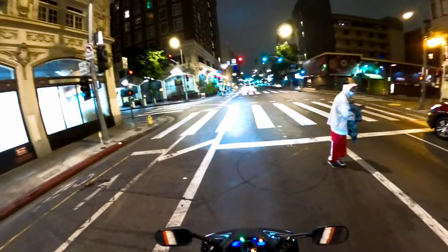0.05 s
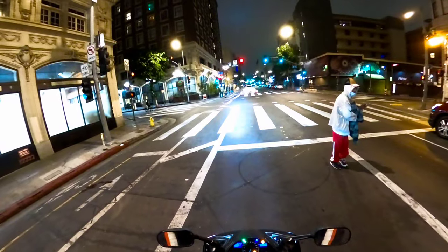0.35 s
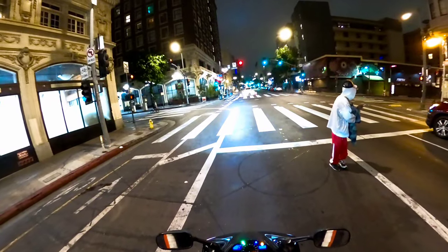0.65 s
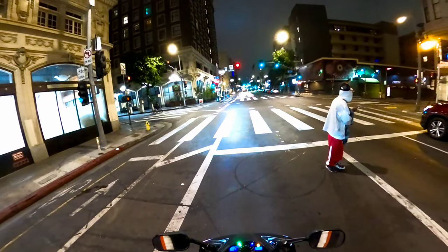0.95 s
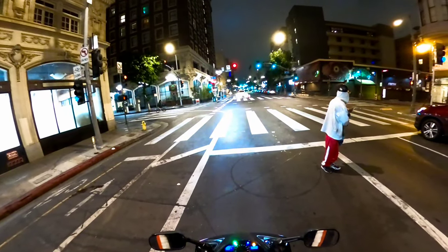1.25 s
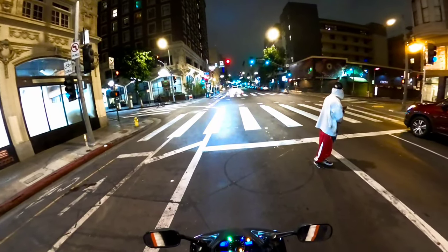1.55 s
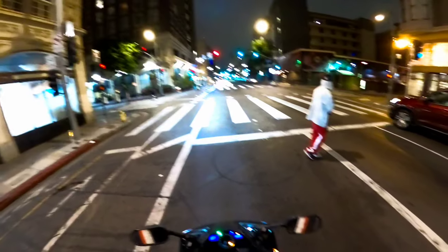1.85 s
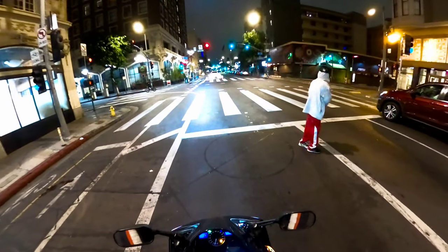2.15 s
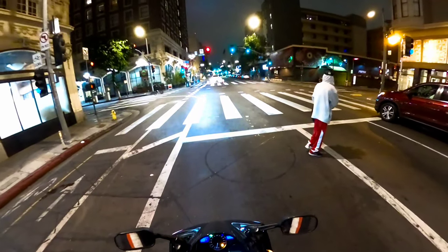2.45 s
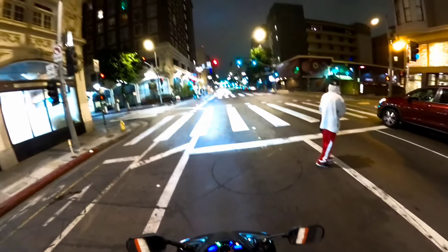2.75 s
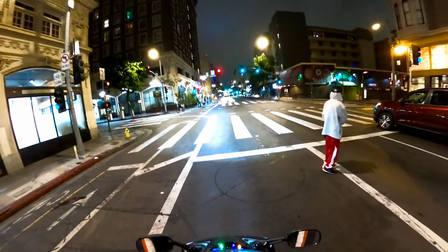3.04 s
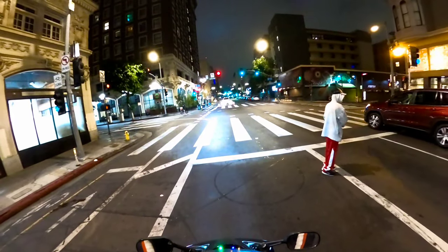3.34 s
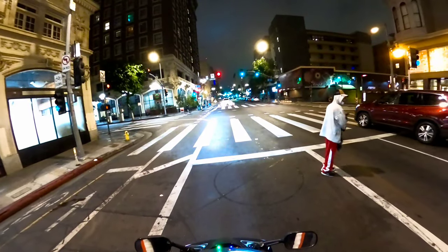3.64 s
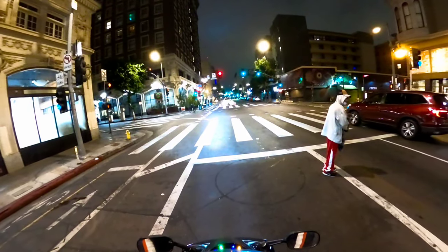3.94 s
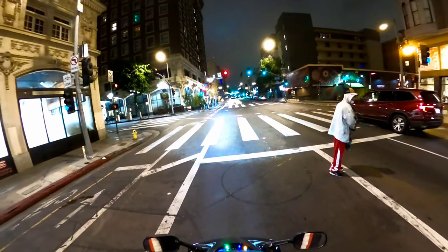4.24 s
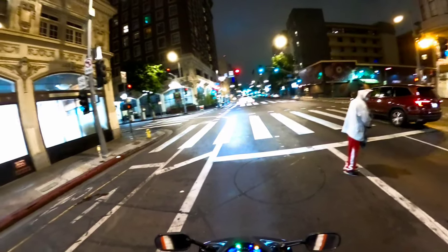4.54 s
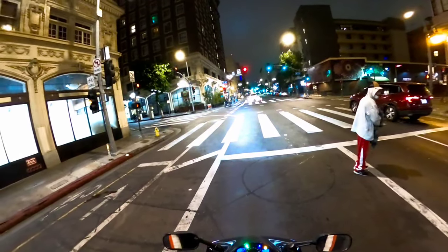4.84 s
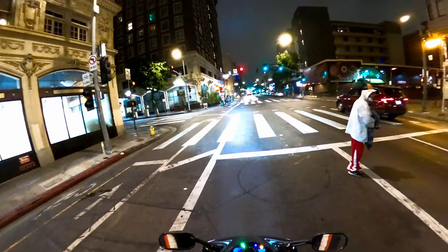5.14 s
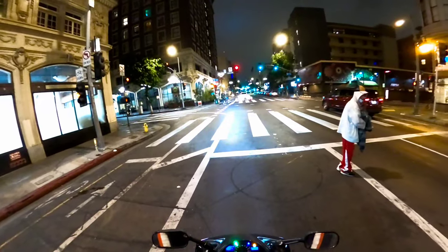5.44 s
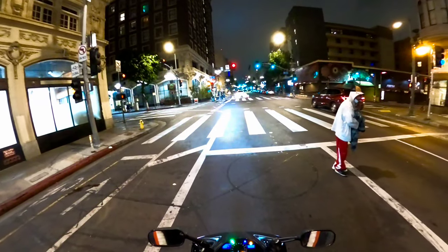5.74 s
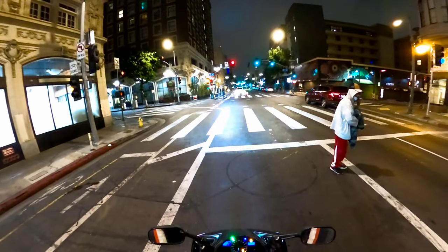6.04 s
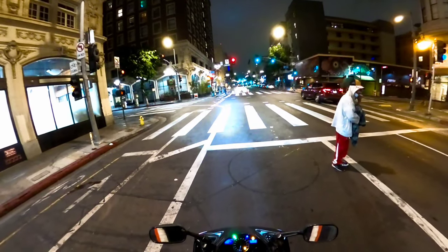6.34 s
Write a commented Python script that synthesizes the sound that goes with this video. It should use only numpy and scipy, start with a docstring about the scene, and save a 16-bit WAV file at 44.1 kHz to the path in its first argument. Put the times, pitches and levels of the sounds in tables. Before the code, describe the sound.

A four-cylinder motorcycle with open pipes idles at a city crossing, heard close from the saddle. The throttle is blipped four times in the first two seconds, each a short rising bark with a little air hiss, burbling as it falls. The deep idle runs on, then comes a fifth, slower rev. Near the end something close by creaks faintly over the idle.

```python
"""A four-cylinder motorcycle with open pipes idles at a night-time crossing, heard from the saddle.
The rider blips the throttle (opens it briefly) five times. Each firing, one burn of fuel in a cylinder,
booms and drones in the exhaust, and barks when the throttle opens. Air hisses in, gas puffs out, and
valves and gears whirr. There is one faint tick, and near the end something close by creaks briefly,
perhaps the rider's gear."""
import sys
import numpy as np
from scipy import signal
from scipy.fft import rfft, irfft, next_fast_len
from scipy.io import wavfile
from scipy.ndimage import uniform_filter1d, minimum_filter1d, map_coordinates

SR = 44100
rng = np.random.default_rng(int(sys.argv[2]) if len(sys.argv) > 2 else 0)


def unload_wav(signal):
    """Save mono or channel-first audio to the path in sys.argv[1] as 16-bit WAV at rate SR, clipped to [-1, 1]."""
    wavfile.write(
        sys.argv[1],
        SR,
        np.round(np.clip(np.atleast_2d(signal).T, -1, 1) * 32767).astype(np.int16),
    )


N = 286209
TIME = np.arange(N) / SR
IDLE_PER_S = 40.93   # typical firings per second at idle


def from_db(db):
    """Turn decibels into a number to multiply by."""
    return 10 ** (np.asarray(db) / 20)


def unit_power(x):
    """Scale a sound so that its average power is 1."""
    return x / np.sqrt(np.mean(x ** 2) + 1e-20)


def evened(x, span_s):
    """Hold the power near 1 over about span_s, keeping the single beats."""
    size = int(span_s * SR)
    return x / np.sqrt(uniform_filter1d(uniform_filter1d(x * x, size), size) + 1e-14)


def curves(rows):
    """Join a table's rows by straight lines: one curve for each column after the time."""
    times, *columns = np.transpose(rows)
    return [np.interp(TIME, times, column) for column in columns]


def ramp(start_s, end_s):
    """Rise from 0 to 1 between two times."""
    return np.clip((TIME - start_s) / (end_s - start_s), 0, 1)


def bump(time_s, width_s):
    """A smooth bump of height 1 around time_s."""
    return np.exp(-((TIME - time_s) / width_s) ** 2)


def wander(per_s):
    """A smooth random curve, roughly 1 either way, that changes about per_s times a second."""
    return map_coordinates(rng.standard_normal(400), [TIME * per_s + 2], order=2, mode="mirror")


def cut(x, hz, keep, order):
    """Keep the low, high or band part of a sound; a higher order cuts more sharply."""
    sections = signal.butter(order, np.clip(hz, 10, .45 * SR), keep, fs=SR, output="sos")
    return signal.sosfilt(sections, x + 1e-18)


def ring(x, hz, width_hz):
    """Make a sound ring at one pitch; a narrower width rings longer."""
    r = np.exp(-np.pi * width_hz / SR)
    feedback = [1, -2 * r * np.cos(2 * np.pi * hz / SR), r * r]
    return signal.lfilter(np.array([1, 0, -1]) * (1 - r * r) / 2, feedback, x + 1e-18)


def body(x, tones):
    """Ring an object at all its pitches at once, flipping the sign of every second one."""
    return sum((-1) ** k * from_db(db) * ring(x, hz, width) for k, (hz, width, db) in enumerate(tones))


def coloured_noise(colour):
    """Noise of power 1, shaped by rows of pitch_hz, relative_db."""
    hz, db = np.transpose(colour)
    size = next_fast_len(N)
    bins = np.maximum(np.fft.rfftfreq(size, 1 / SR), 1)
    gain = from_db(np.interp(np.log(bins), np.log(hz), db)) * np.minimum(bins / hz[0], 1) ** 2
    return unit_power(irfft(rfft(rng.standard_normal(size)) * gain, size)[:N])


def clicks(times, sizes):
    """One click of the given size at each time."""
    out = np.zeros(N)
    np.add.at(out, np.clip(np.round(times * SR).astype(int), 0, N - 1), sizes * (times > 0))
    return out


# The idle speed, drifting up and down: time_s, firings_per_s
IDLE_SPEED = [(0.0, 38.74), (0.49, 37.31), (0.95, 39.36), (1.23, 37.79), (2.12, 40.93), (2.44, 41.22),
              (2.56, 38.01), (2.98, 42.21), (3.16, 44.45), (3.33, 42.21), (3.51, 44.52), (3.71, 41.06),
              (3.96, 44.21), (4.92, 40.79), (5.07, 36.98), (5.22, 37.73), (5.32, 42.61), (6.49, 42.05)]
# Throttle blips: start_s, air_peak_s, revs_peak_s, added_firings_per_s, bark_boost_db, hiss_db
BLIPS = [(0.003, .15, 0.185, 21.71, 5, -55), (0.527, .6, 0.648, 32.61, 8, -49.5),
         (1.314, 1.43, 1.495, 29.61, 6.5, -50), (1.742, 1.77, 1.86, 50.71, 8.3, -48),
         (4.167, 4.3, 4.51, 36.31, 9, -57)]
def engine_speed():
    """Firings per second (the revs): each blip drives them up ever faster, then friction slows them."""
    climb_power, run_down_s = 1.312, .2428
    per_s, = curves(IDLE_SPEED)
    for start_s, _, peak_s, added, *_ in BLIPS:
        run_down = np.exp(-np.maximum(TIME - peak_s, 0) / run_down_s)
        per_s = per_s + added * ramp(start_s, peak_s) ** climb_power * run_down
    return per_s


def throttle_opening(start_s, peak_s):
    """The throttle (0-1) is rolled open, then let go just before the revs peak."""
    shut_s = peak_s - .035
    return ramp(start_s, shut_s) ** 0.75 * (1 - ramp(shut_s, shut_s + .085))


def gulp(start_s, peak_s, fade_s=0.091):
    """The rush of air into the engine (0-1) swells as the throttle opens, then fades."""
    return ramp(start_s, peak_s) * np.exp(-np.maximum(TIME - peak_s, 0) / fade_s)


def near_rev_peaks(after_s, width_s):
    """A bump after_s later than each blip's peak of revs."""
    return sum(bump(peak_s + after_s, width_s) for _, _, peak_s, *_ in BLIPS)


# The four cylinders in firing order: strength_db, late_at_idle_s
CYLINDERS = [(-1.5, 0.00016), (0.57, 0.000073), (-1, 0.00023), (-0.5, 0.00034)]
def firings(count, lumpy, rough_db, jitter_s):
    """One pulse per firing, sent to the two exhaust branches in turn; no two burns are alike."""
    number = np.arange(1, int(count[-1]) + 1)
    strength_db, late_s = np.array(CYLINDERS)[number % len(CYLINDERS)].T
    chance = rng.standard_normal((len(number), 2))
    unevenness = np.interp(number, count, lumpy)
    times = np.interp(number, count, TIME) + unevenness * (late_s + jitter_s * chance[:, 0])
    sizes = from_db(strength_db + unevenness * rough_db * chance[:, 1])
    return [clicks(times, sizes * (number % 2 == branch)) for branch in range(2)]


def boom(count, lumpy):
    """The gas flow swells once per firing: a bass note and its octave, burbling more above idle."""
    angle = 2 * np.pi * (count - .3)
    note = np.sin(angle) + from_db(-8.5) * np.sin(2 * angle)
    burble = coloured_noise([(50, 0), (75, 2), (105, -8.5), (135, -6.5), (170, -35.5), (400, -91)])
    return unit_power(note + from_db(-21.5) * lumpy * burble)


# One row per exhaust branch, with two tones, the first feeding the second. Each tone: pitch_hz, width_hz
BRANCH_TONES = [
    [(152, 25), (212, 23.7)],
    [(152, 18.6), (234, 36.3)],
]
def drone(count, lumpy):
    """Each pulse swells and dies in its branch; the branches ring differently, so the beats alternate."""
    pipes = 0
    for branch, tones in zip(firings(count, lumpy, rough_db=1.0, jitter_s=0.00014), BRANCH_TONES):
        for hz, width_hz in tones:
            branch = ring(branch, hz, width_hz)
        pipes = pipes + branch
    pipes = cut(pipes, hz=204.6, keep="low", order=4)
    pipes = cut(pipes, hz=128, keep="high", order=3)   # a pipe lets out little below its lowest tone
    return evened(street_echoes(pipes), span_s=0.035)


# The higher tones of the pipes: pitch_hz, width_hz, relative_db
BARK_TONES = [(281.6, 13, -3.5), (358.7, 17, -1), (470.2, 22.9, 0), (622.6, 31, -7.5)]
def bark(count, lumpy, puff, throttle):
    """Each pulse's sharp front and swirling gas ring the higher pipe tones, flaring unevenly."""
    fronts = unit_power(sum(firings(count, lumpy, rough_db=1.5, jitter_s=.00006)))
    # With the throttle open the burns are fuller, so the fronts stand out of the swirl.
    swirl = unit_power(puff * rng.standard_normal(N)) * from_db(-9 * throttle)
    gas = fronts + swirl
    airbox_growl = np.sqrt(throttle) * ring(gas, hz=327, width_hz=91)
    sound = body(gas, BARK_TONES) + from_db(6) * airbox_growl
    sound = cut(sound, hz=238, keep="high", order=3)
    sound = cut(sound, hz=630, keep="low", order=4)
    return evened(street_echoes(sound), span_s=0.1) * from_db(0.86 * wander(per_s=22))


# Echoes from the road and shop fronts: delay_s, relative_db
ECHOES = [(0.029, -19.5), (0.058, -25), (0.095, -23), (.147, -28)]
def street_echoes(x):
    """Hard surfaces send back late, quieter copies that join the sound."""
    return x + sum(from_db(db) * np.interp(TIME - delay_s, TIME, x, left=0) for delay_s, db in ECHOES)


# Firings that fail as the revs fall: time_s, drone_drop_db
MISFIRES = [(0.261, 3.5), (0.38, 2), (.67, 5), (1.55, 3), (1.685, 3.5), (2.078, 5.5), (2.205, 5.5),
            (4.63, 5.5)]
def exhaust(per_s, count, puff, high_revs):
    """Boom, drone and bark follow the throttle and the revs, and the last two stumble at misfires."""
    throttle = sum(throttle_opening(start_s, peak_s) for start_s, _, peak_s, *_ in BLIPS)
    load_db = sum(db * throttle_opening(start_s, peak_s) for start_s, _, peak_s, _, db, _ in BLIPS)
    effort = np.clip((per_s - 43) / 2.4, 0, 1)   # the engine starts to pull just above idle
    # Above idle the firings grow uneven, most of all with the throttle shut.
    lumpy = 1 + 2.3 * np.clip((per_s - IDLE_PER_S) / 14, 0, 1) * (1 - .9 * throttle)
    # The drone swells just before high revs peak; the boom chokes just after.
    swell_db = 4.5 * high_revs * near_rev_peaks(after_s=-.025, width_s=.04)
    choke_db = -9 * high_revs * near_rev_peaks(after_s=0.039, width_s=0.024)
    flare_db = 3.5 * near_rev_peaks(after_s=.148, width_s=0.018)   # unburnt fuel flares in the pipe
    stumble_db = -sum(db * bump(time_s, width_s=0.02) for time_s, db in MISFIRES)
    octaves_up = np.log2(per_s / IDLE_PER_S)
    boom_db = -23.5 + 4 * effort + 3.2 * throttle - 2.5 * high_revs + choke_db + 0.42 * flare_db
    drone_db = -12 - 2 * effort + 1.8 * high_revs + swell_db + stumble_db
    bark_db = -34.5 + 2 * effort + 5.5 * octaves_up + load_db + flare_db + 0.49 * stumble_db
    return (from_db(boom_db) * boom(count, lumpy)
            + from_db(drone_db) * drone(count, lumpy)
            + from_db(bark_db) * bark(count, lumpy, puff, throttle))


# The hiss of air drawn past the throttle: pitch_hz, relative_db
INTAKE_COLOUR = [(800, -0.5), (2000, -2), (4000, -6), (7300, -18), (8400, -29), (12000, -44)]
def intake_hiss(high_revs):
    """Air hisses past the throttle at each gulp, and faintly while the revs are high."""
    gulps = sum(from_db(db) * gulp(start_s, peak_s) for start_s, peak_s, *_, db in BLIPS)
    return (gulps + from_db(-56.5) * high_revs) * coloured_noise(INTAKE_COLOUR)


# The hiss of the gas: pitch_hz, relative_db
GAS_COLOUR = [(400, -3), (700, 6), (1000, -3), (1400, -7.5), (2000, -7.5), (2800, -14.5), (4000, -16),
              (5200, -23.5), (7300, -25.5), (8300, -36), (11000, -49.5), (15000, -58)]
# The ringing of the engine cases: pitch_hz, width_hz, relative_db
CASE_TONES = [(917, 40, -3.5), (1167, 49, -2), (1479, 79, -7), (2830, 410, -18), (3720, 85, -18)]
# How loud the hiss and whirr are with the throttle shut: time_s, level_db
WHIRR_LEVELS = [(0, -44.5), (.8, -45.5), (1.25, -46), (2.2, -45), (2.55, -43.5), (2.85, -44), (3.15, -45.5),
                (4.1, -45), (4.8, -46.5), (5.35, -44.5), (6.49, -45.5)]
def hiss_and_whirr(count, puff):
    """Gas hiss throbs lightly with the firings; ticking valves and whirring gears ring the cases."""
    hiss = coloured_noise(GAS_COLOUR) * unit_power(1 + 0.24 * puff)
    valve_times = np.interp(np.arange(0, count[-1], .5), count, TIME)   # two valves shut per firing
    taps = unit_power(clicks(valve_times, from_db(5.4 * rng.standard_normal(len(valve_times)))))
    gears = rng.standard_normal(N)
    cases = unit_power(cut(body(gears + 0.42 * taps, CASE_TONES), hz=4150, keep="low", order=4))
    gulps = sum(gulp(start_s, peak_s) for start_s, peak_s, *_ in BLIPS)
    level_db = curves(WHIRR_LEVELS)[0] + 5 * gulps + 0.87 * wander(per_s=22)
    return from_db(level_db) * (hiss + from_db(-5.5) * cases)


# One small tick: start_s, level_before_filter_db
TICKS = [(2.598, -40.5)]
def tick(fade_s=.003):
    """A faint, bright tick: a burst of noise that dies at once."""
    burst = sum(from_db(db) * (TIME >= s) * np.exp(-np.abs(TIME - s) / fade_s) for s, db in TICKS)
    return cut(burst * rng.standard_normal(N), hz=[5600, 7800], keep="band", order=3)


# How the creak unfolds: time_s, slips_per_s, level_db
CREAK_SLIPS = [(5.3, 184, -79), (5.42, 174, -49), (5.5, 174, -39), (5.57, 180, -44), (5.63, 120, -43),
               (5.68, 85, -48.5), (5.76, 60, -50.5), (5.86, 58, -67)]
# The ringing of the creaking part: pitch_hz, width_hz, relative_db
CREAK_TONES = [(758, 270, -1), (1433, 680, -6), (2390, 250, 2), (3300, 1900, -15), (4860, 900, -9.5),
               (5900, 520, -11.5), (7400, 900, -19)]
def creak(slip_fade_s=.0012):
    """A small stiff part sticks and slips in uneven snaps that slow down."""
    per_s, level_db = curves(CREAK_SLIPS)
    slips = np.cumsum(per_s) / SR
    chance = rng.standard_normal((int(slips[-1]), 2))
    times = np.interp(np.arange(len(chance)) + 0.25 * chance[:, 0], slips, TIME)
    snaps = clicks(times, from_db(3.5 * chance[:, 1]))
    bursts = signal.lfilter([1], [1, -np.exp(-1 / (slip_fade_s * SR))], snaps)
    friction = (bursts + 0.21) * rng.standard_normal(N)   # short bursts over a steady rub
    sound = cut(body(friction, CREAK_TONES), hz=7500, keep="low", order=10)
    creaking = (TIME > CREAK_SLIPS[0][0]) & (TIME < CREAK_SLIPS[-1][0])
    return from_db(level_db) * evened(sound, span_s=0.054) * creaking


def scene():
    """Exhaust, engine and small noises, added into one channel."""
    per_s = engine_speed()
    count = np.cumsum(per_s) / SR + .72   # firings so far
    high_revs = np.clip((per_s - 58) / 14, 0, 1)
    puff = 1 + np.cos(2 * np.pi * (count - .3))   # gas flow swells while a valve is open
    motorcycle = (exhaust(per_s, count, puff, high_revs)
                  + intake_hiss(high_revs)
                  + hiss_and_whirr(count, puff))
    return (motorcycle + creak() + tick())[None]


def record(dry):
    """Smoothly turn down the loudest peaks, then cut the highest treble."""
    ceiling, window, cutoff_hz = .7, int(.012 * SR), 15300
    gain = minimum_filter1d(ceiling / np.maximum(np.abs(dry), ceiling), 2 * window)
    gain = uniform_filter1d(uniform_filter1d(gain, window), window)
    return signal.sosfilt(signal.cheby2(12, 70, cutoff_hz, fs=SR, output="sos"), gain * dry)


dry = scene()
out = record(dry)
unload_wav(out)
```